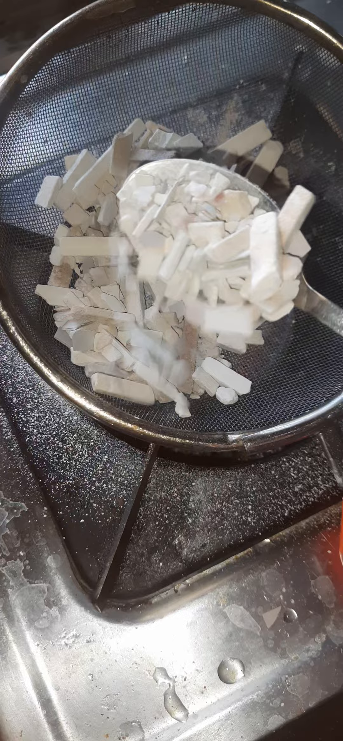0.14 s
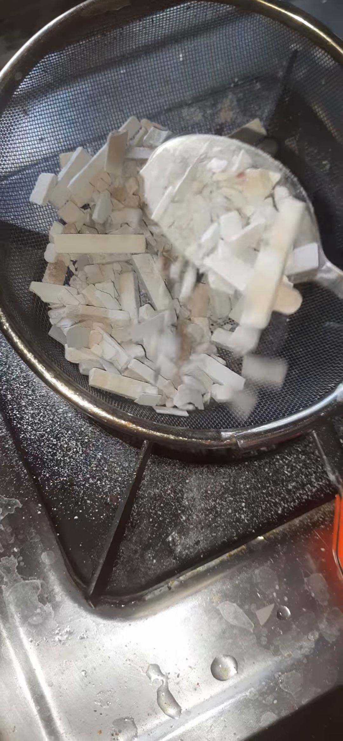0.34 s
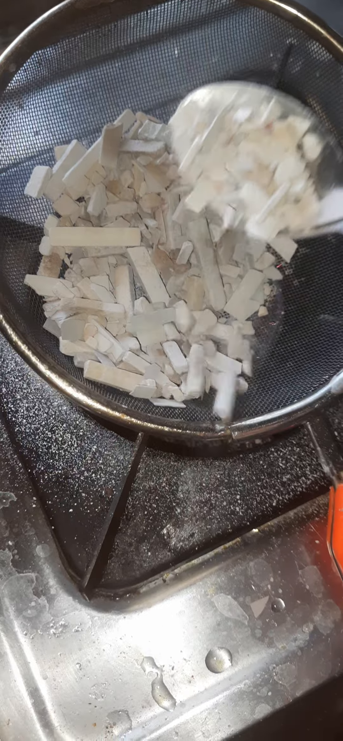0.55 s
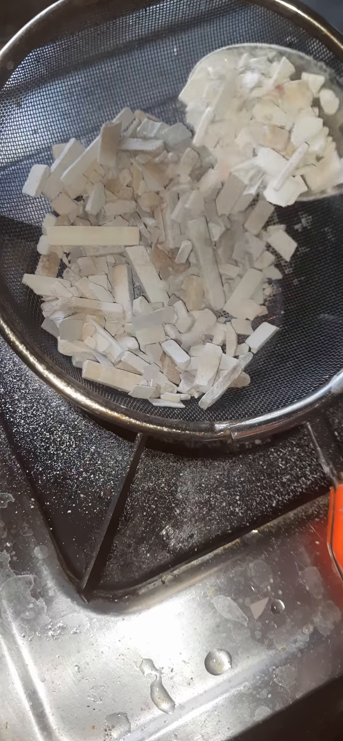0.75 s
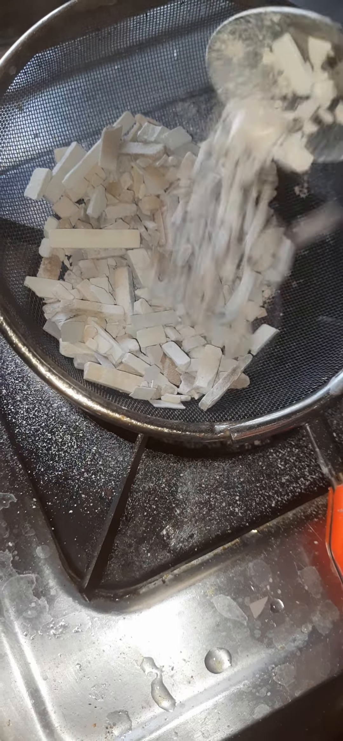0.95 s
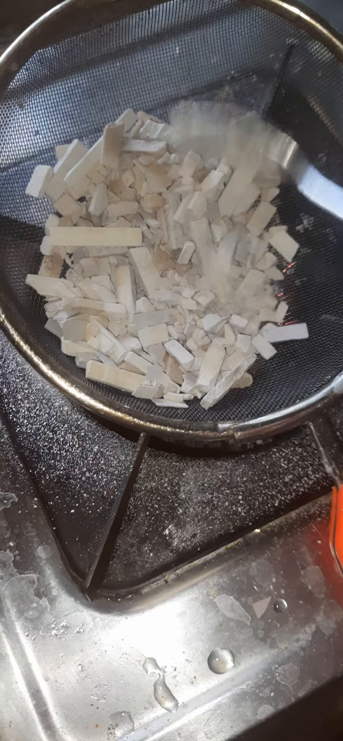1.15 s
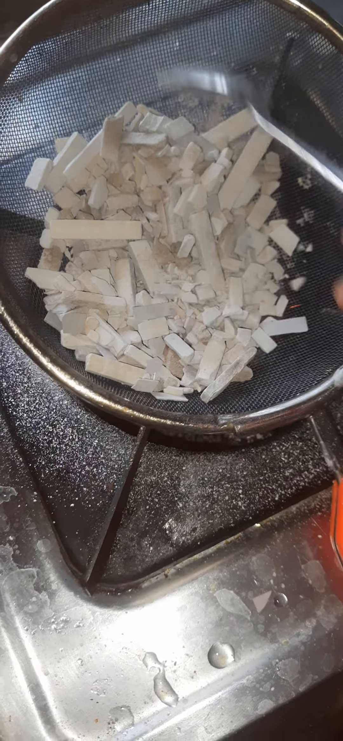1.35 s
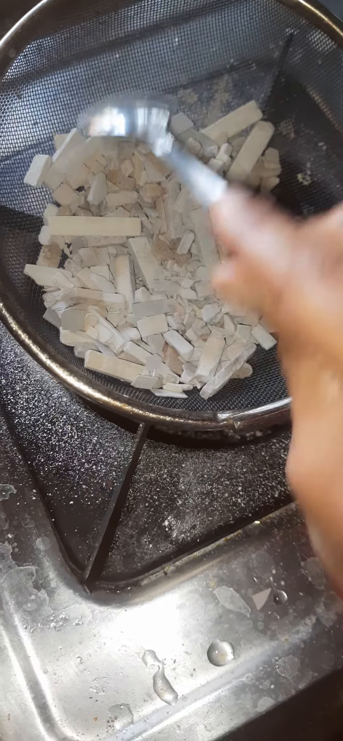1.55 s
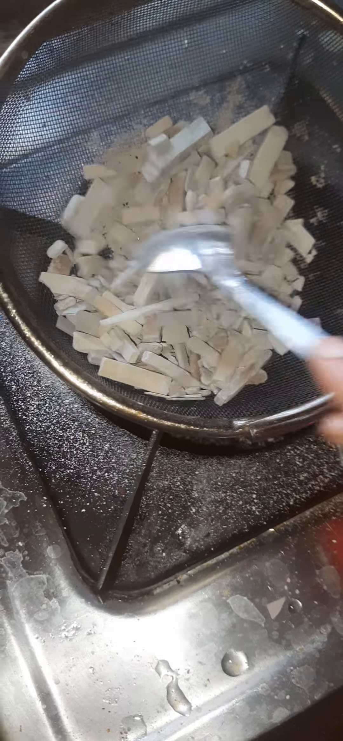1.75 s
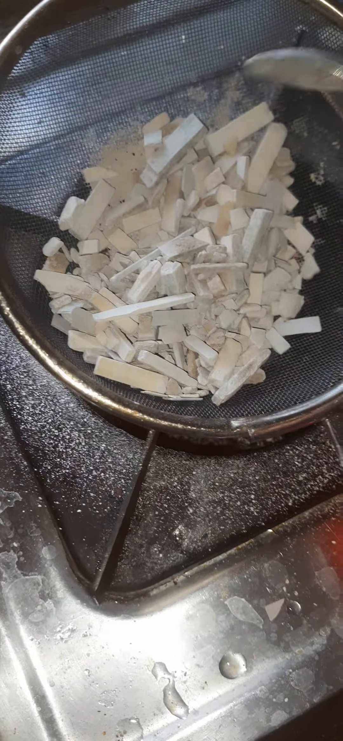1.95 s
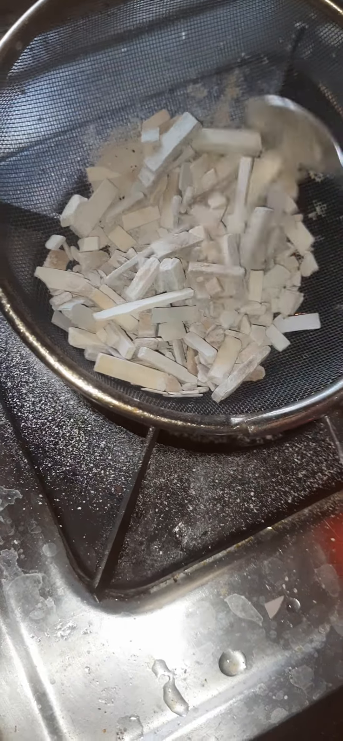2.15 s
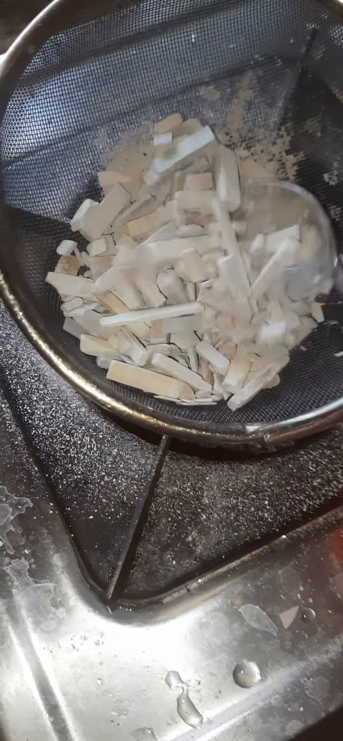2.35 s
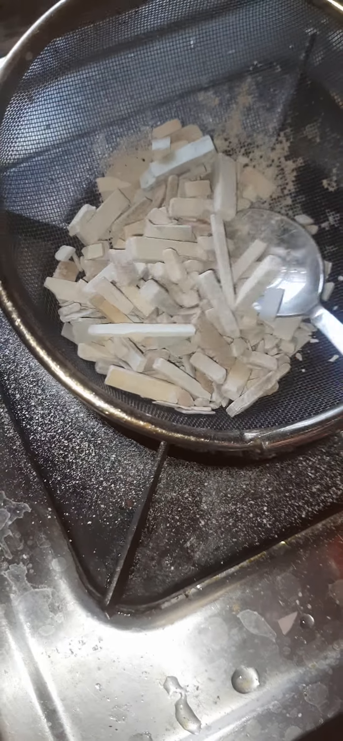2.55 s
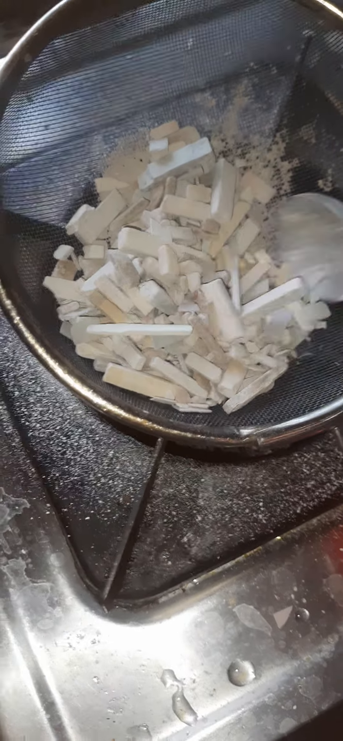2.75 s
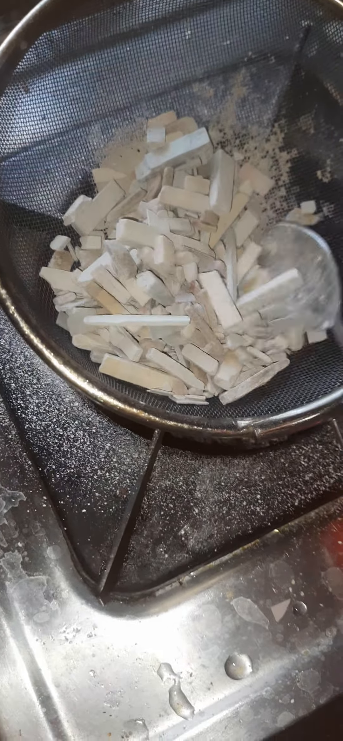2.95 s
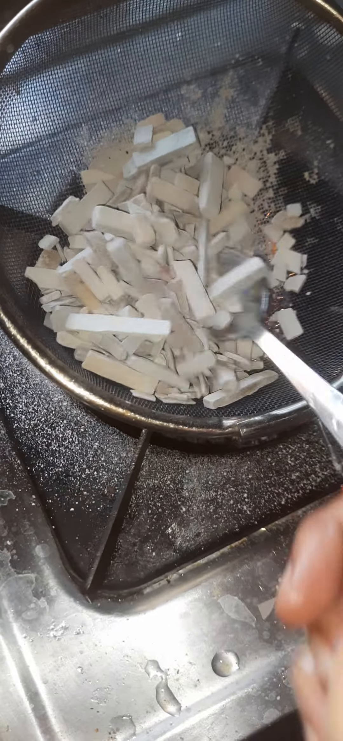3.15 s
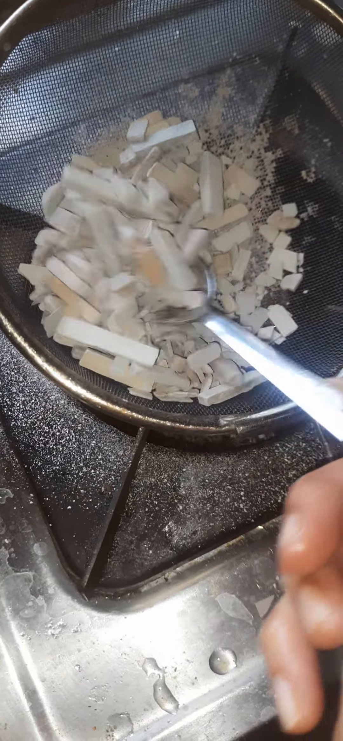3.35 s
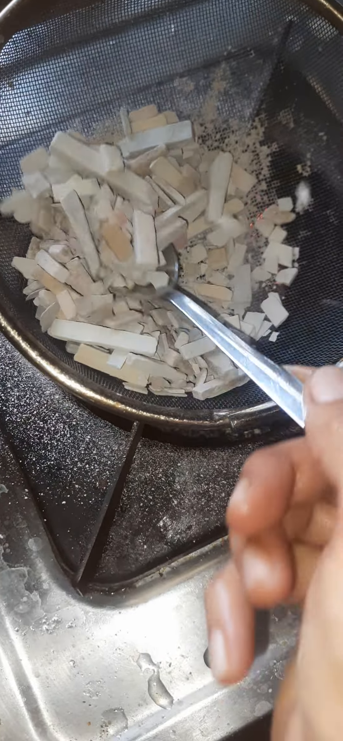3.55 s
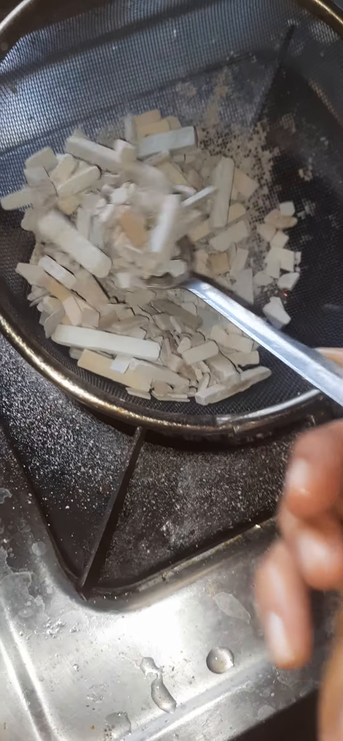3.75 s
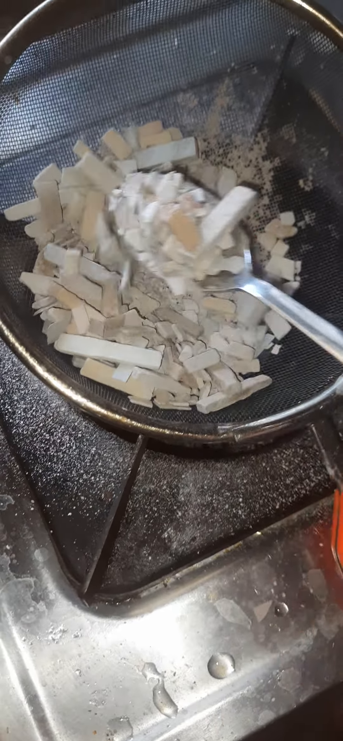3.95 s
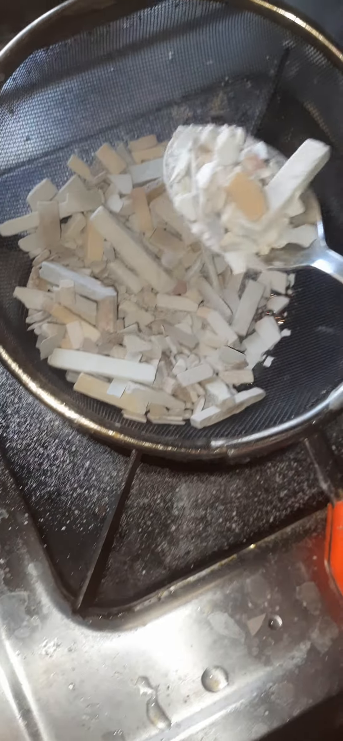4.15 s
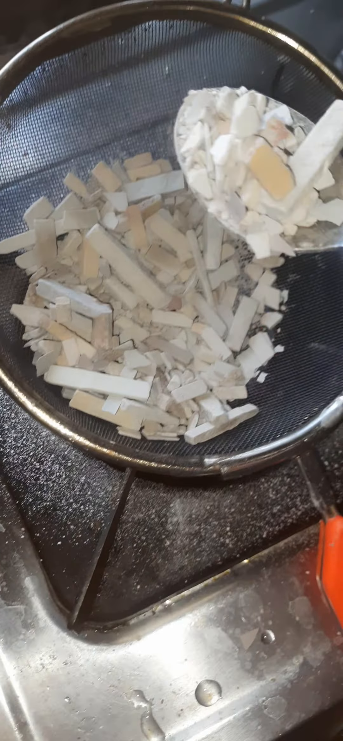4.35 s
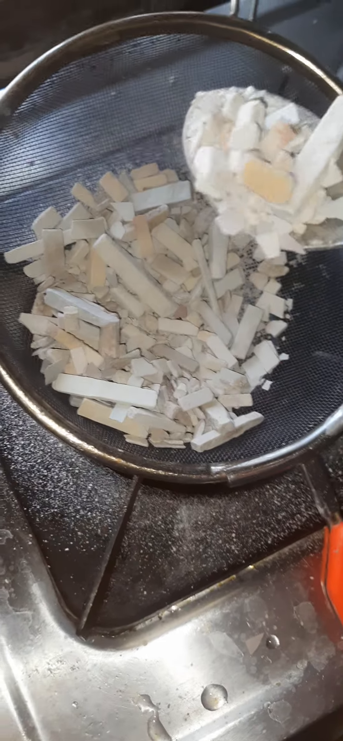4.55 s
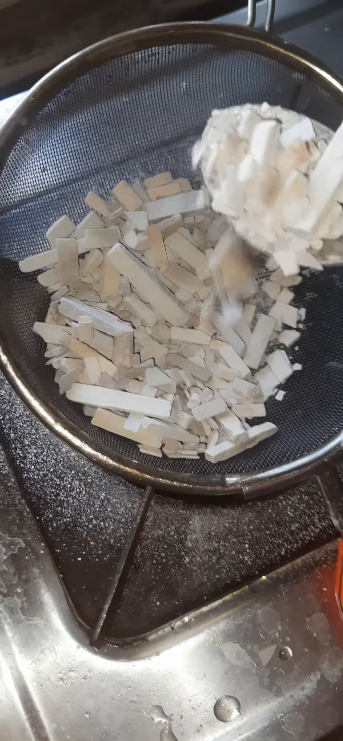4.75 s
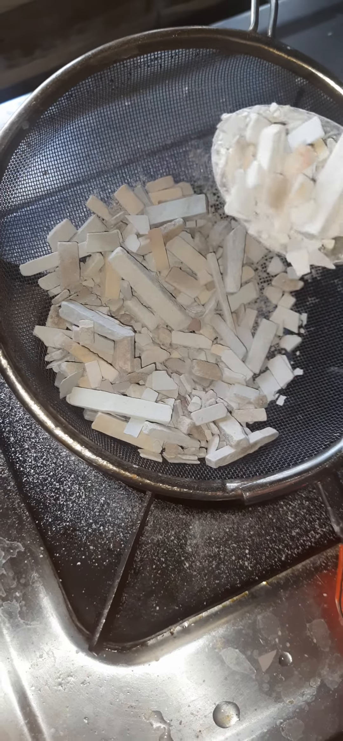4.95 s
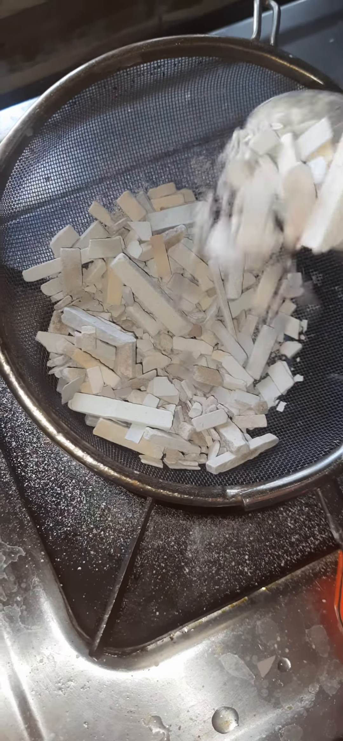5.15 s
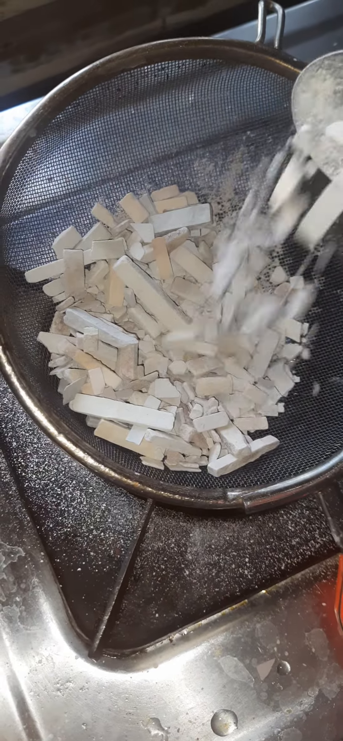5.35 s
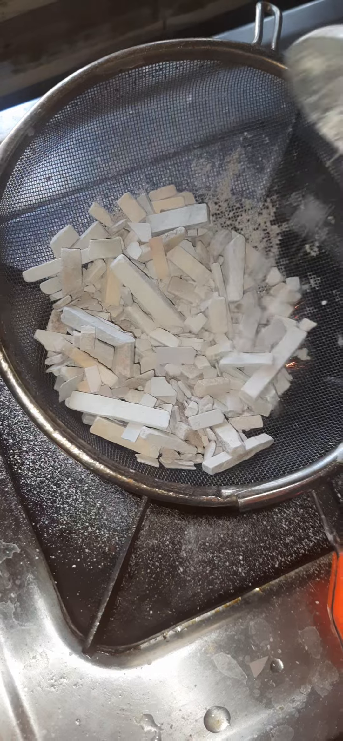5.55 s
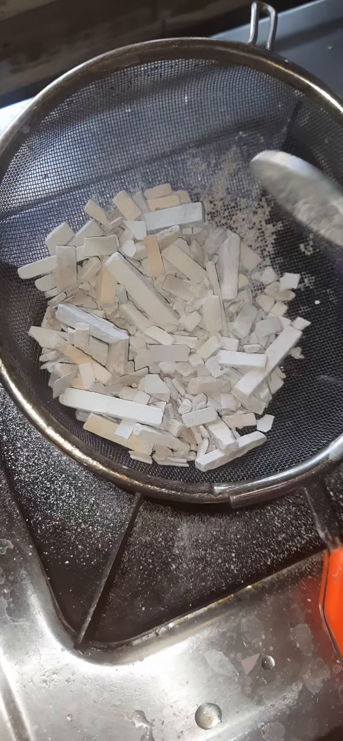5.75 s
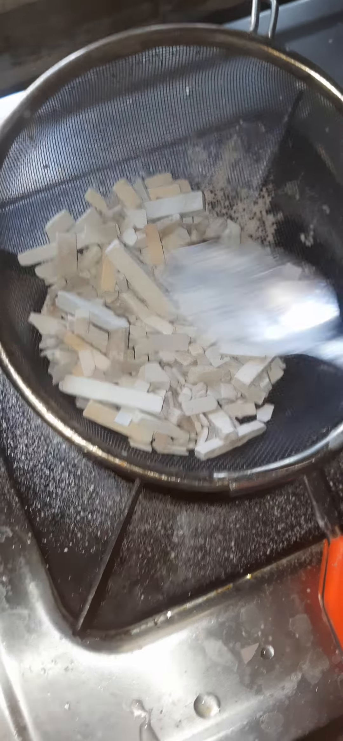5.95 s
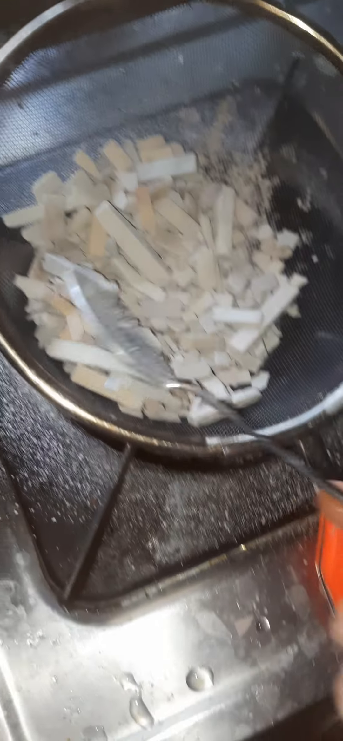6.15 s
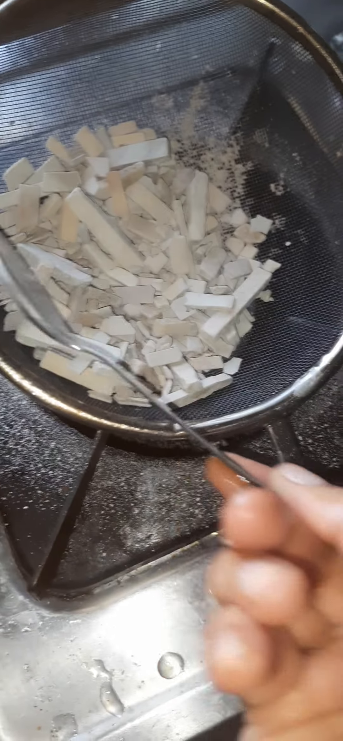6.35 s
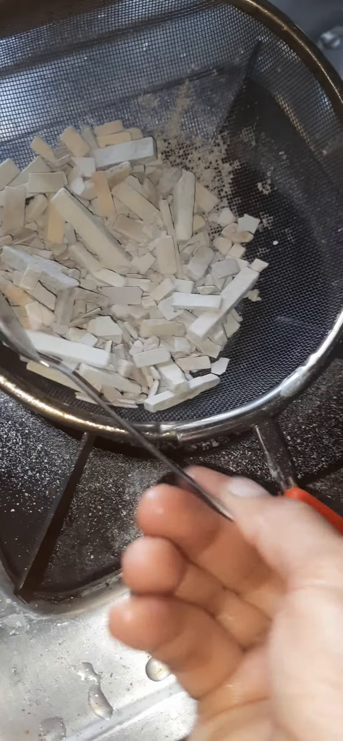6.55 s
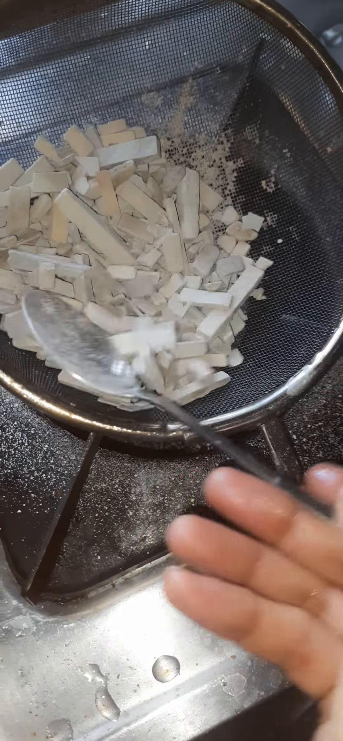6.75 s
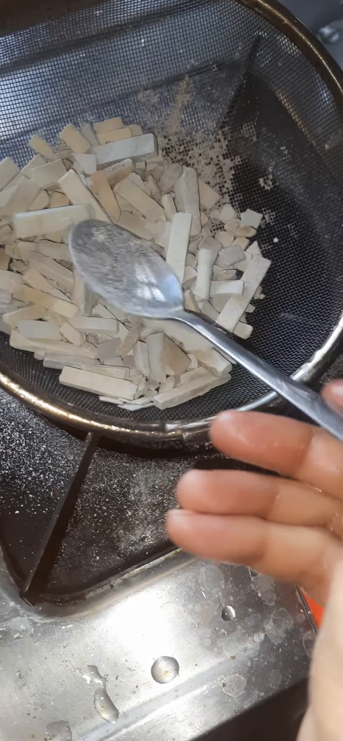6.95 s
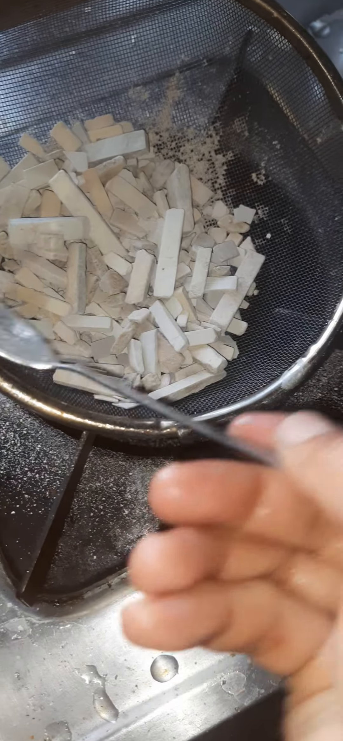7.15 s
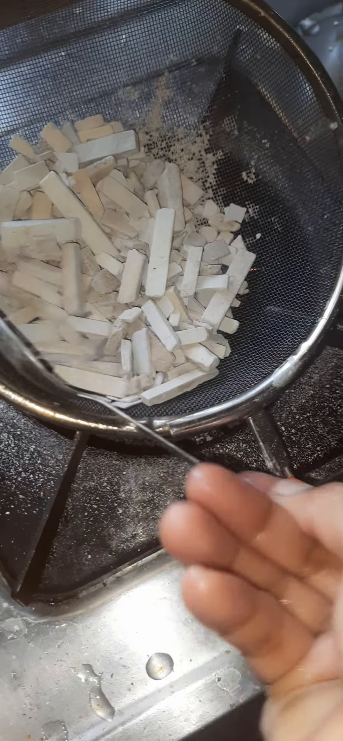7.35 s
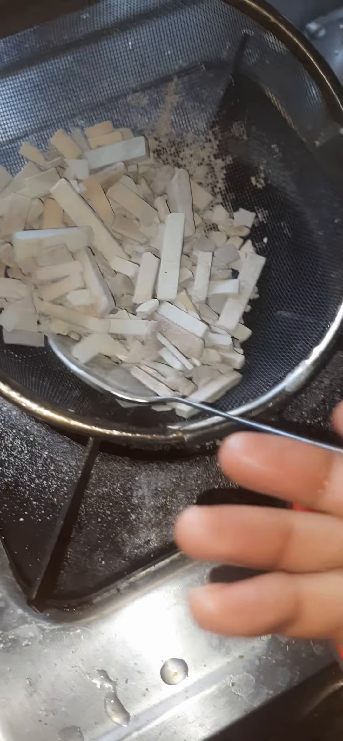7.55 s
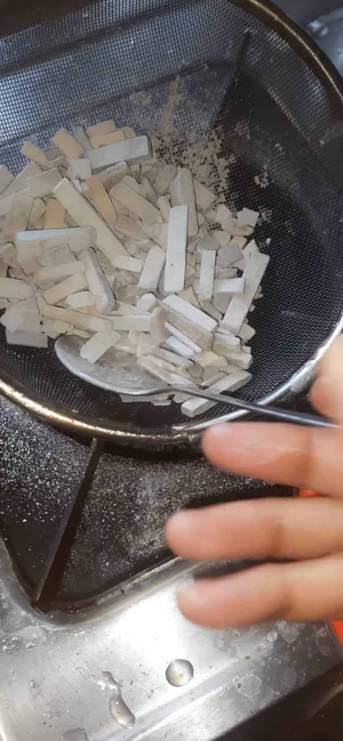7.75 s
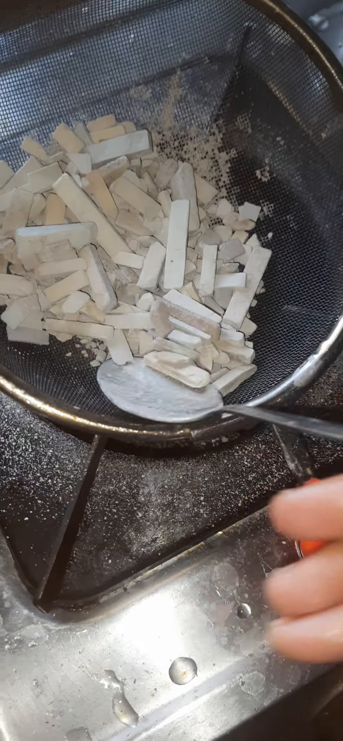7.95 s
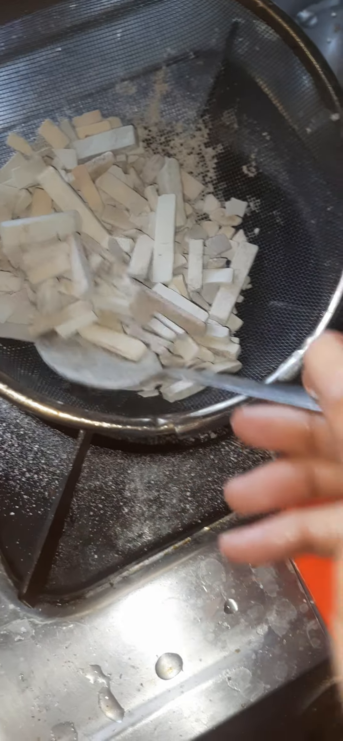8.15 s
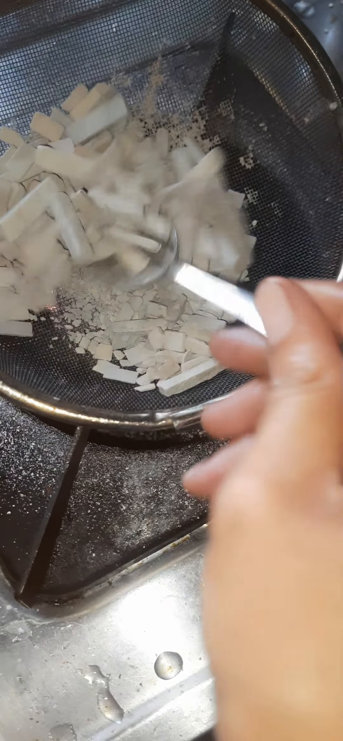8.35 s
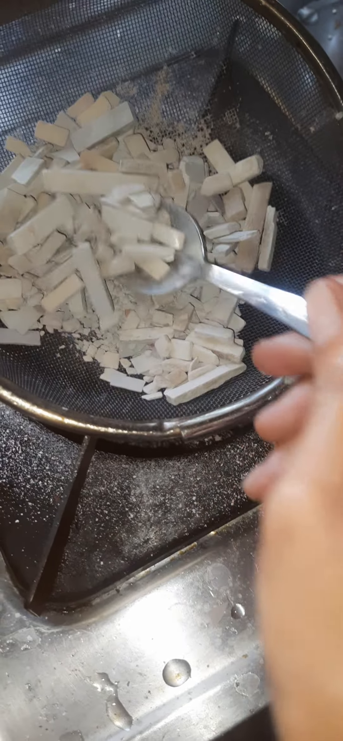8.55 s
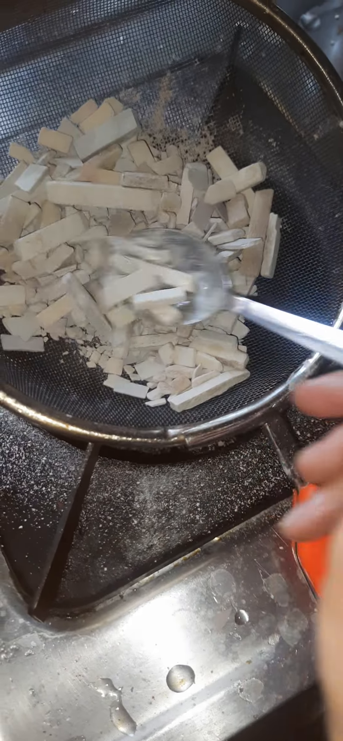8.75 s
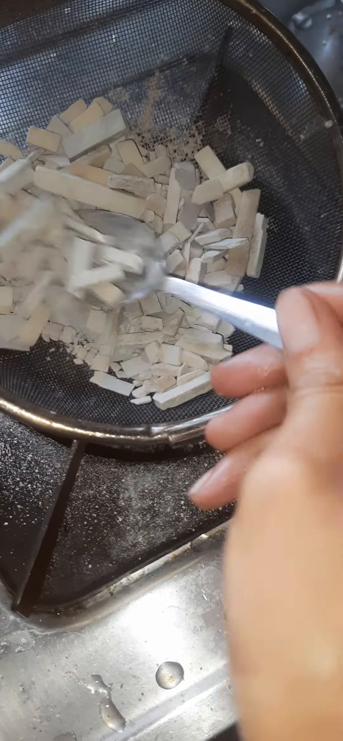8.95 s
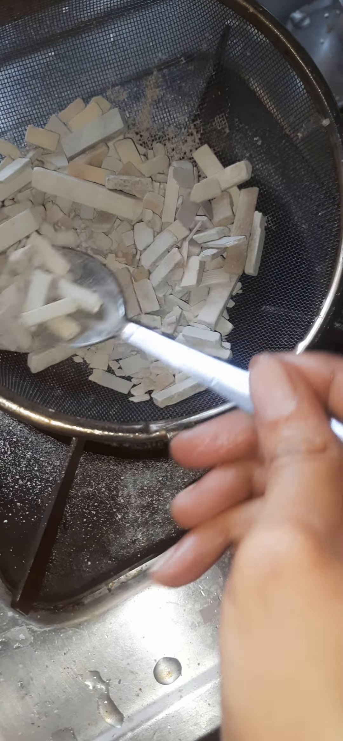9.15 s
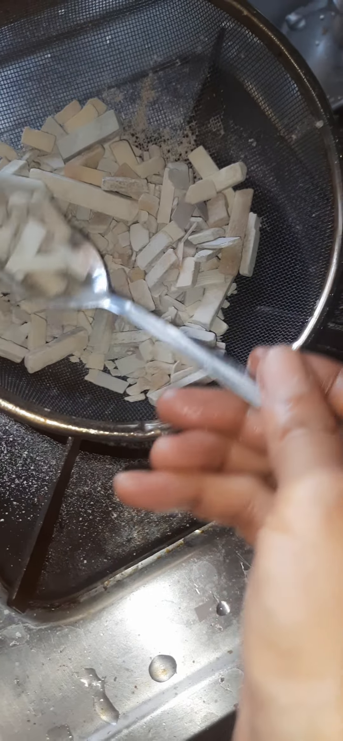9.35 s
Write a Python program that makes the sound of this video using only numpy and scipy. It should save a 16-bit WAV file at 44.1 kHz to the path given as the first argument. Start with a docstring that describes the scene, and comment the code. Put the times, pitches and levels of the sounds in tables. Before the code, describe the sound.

Close up in a hard kitchen, a gas flame rumbles softly throughout. A dense run of bright stone clacks opens as slate pieces fall from a steel spoon into a wire strainer. Stirring follows, with hard blows booming through mesh and stove around two to three and a half seconds. Sparse pours and scrapes come next, another bang near seven, then busy stirring and light tinkles. Close phone stereo, short reverberation.

```python
"""Close in a hard kitchen: slate pieces are scooped, poured and stirred with a steel spoon in a wire strainer.
A gas flame rumbles and hisses under the whole scene; a dense run of stone clacks opens it. Hard blows near
2.3, 2.8 and 3.5 s boom in strainer and stove, the first two with a jolt of air; faint swishes pass near 4 and
6 s, another hard blow falls near 7 s and tinkling strokes close it. Filtered noise makes flame and swishes,
random impulses the heap, struck resonances the blows and rings; two microphone ports of a phone pick it up."""
import sys
import numpy as np
from scipy import signal
from scipy.fft import rfft, irfft, next_fast_len
from scipy.io import wavfile
from scipy.ndimage import uniform_filter1d, map_coordinates

SR = 44100
rng = np.random.default_rng(int(sys.argv[2]) if len(sys.argv) > 2 else 0)


def master(y):
    """Save y as 16-bit WAV."""
    cut = np.clip(np.atleast_2d(y).T, -1, 1)
    pcm = np.round(cut * 32767)  # scale
    wavfile.write(sys.argv[1], SR, pcm.astype(np.int16))


N = 418509  # length in samples

# The flame's slow rise and fall. Each row: time in seconds, base rumble level in dB.
FLAME_LEVEL = [(0, -64.5), (1.2, -62), (1.9, -66), (3.4, -65.5), (4.9, -66.5), (6.5, -68), (9.49, -65)]
# Spectrum of the flame's rumble. Each row: frequency in Hz, relative density in dB per Hz.
RUMBLE_SPECTRUM = [(12, -55), (20, -35.5), (70, 8.5), (102, -5), (134, -1), (184, -12), (400, -34),
                   (520, -43.5), (880, -120)]
# Spectrum of the flame's hiss. Each row: frequency in Hz, relative density in dB per Hz.
HISS_SPECTRUM = [(180, -35.5), (300, -7), (360, -2), (391, -7.5), (676, -12.5), (812, -19.5), (2630, -32),
                 (5650, -32.5), (6780, -22.5), (9770, -32), (11000, -30.5), (15800, -31.5)]
# Decay of the room. Each row: frequency in Hz, time to fall 60 dB in seconds.
KITCHEN_DECAY = [(150, 0.38), (700, 0.62), (1840, 0.52), (4850, 0.34), (12800, 0.27)]
# Likeness of the two ports in diffuse sound. Each row: frequency in Hz, left-right correlation (0 to 1).
PORT_LIKENESS = [(60, 0.55), (130, 0.96), (290, 0.43), (640, 0.065), (1400, 0.043), (15000, 0.017)]
# Colour of the two ports. Each row: frequency in Hz, left minus right in dB.
PORT_COLOUR = [(60, -1.5), (110, 6), (200, 1.5), (380, 0), (700, -6), (1290, 2.5), (2380, 6.5), (4400, 3.5),
               (8120, 4), (15000, 2.5)]
# Faint whistling swishes. Each row: start in seconds, end in seconds, level in dB.
SWISH_TIMES = [(4.153, 4.363, -90), (5.778, 5.943, -81), (5.935, 6.13, -82.5)]
# The stove jolts under the hardest blows. Each row: start in seconds, level in dB before the port gains.
JOLT_PUSHES = [(2.307, -14.5), (2.751, -36.5)]
# Ringing modes of spoon and stone. Each row: frequency in Hz, time to fall 60 dB in seconds.
RINGING_MODES = [(4250, 0.029), (5060, 0.056), (8060, 0.081), (14200, 0.07)]
# Short rings of the steel spoon or, near 4250 Hz, of a stone; the spot favours modes near one pitch.
# Each row: start in seconds, level at the favoured pitch in dB, favoured pitch in Hz.
RINGING_TAPS = [(.44, -37, 4250), (.72, -44, 4250), (.84, -65, 14200), (1.57, -45.5, 14200),
                (6.24, -50.5, 5400), (6.94, -30.5, 6400), (8.41, -50, 14200), (8.55, -55, 5060),
                (8.763, -52, 5060), (8.823, -49, 5060), (9.008, -41, 5060)]
# Modes of strainer and stove. Each row: frequency in Hz, width in Hz, level in dB re the direct blow.
STRAINER_MODES = [(148.5, 5.6, 2.5), (253.4, 14, 5.5), (302.4, 18, -1.5), (355.7, 11, -1), (459.5, 22, 9),
                  (557.3, 8.3, 9), (607, 55, -4), (820, 42, -0.5), (1028, 20, -5), (1190, 9.3, -6.5),
                  (1462, 29, 1), (1727, 30, 3.5), (2210, 62, 9), (2585, 18, 10)]
# Broad thud of soft blows. Each row: frequency in Hz, relative density in dB per Hz.
THUD_SPECTRUM = [(53, -45), (90, -12), (146, -8.5), (185, -10.5), (408, 1.5), (445, -2.5), (494, -8.5),
                 (825, -9.5), (1620, -26.5), (3000, -43), (3900, -58.5), (6600, -120)]
# Hard blows on the frame. Each row: frequency in Hz, relative density in dB per Hz.
KNOCK_SPECTRUM = [(350, -37), (650, -9.5), (1100, 10), (1500, 0), (2400, -5), (3500, -13), (5000, -46)]
# Stone on stone. Each row: frequency in Hz, relative density in dB per Hz.
STONE_SPECTRUM = [(900, -18), (1800, -9), (3000, -5), (5000, -4), (6500, -3), (8000, -1), (8700, -5.5),
                  (9300, -13), (11500, -12), (14000, -11), (15700, -13.5), (16100, -36.5), (17000, -38)]
# Each pour, blow or spoon stroke that sets the heap moving.
# Each row: start in seconds, swell in seconds, hold in seconds, rattle level in dB, boom level in dB.
HEAP_STROKES = [(0.003, .006, 0.02, -57.5, -60), (.1256, 0.015, 0.096, -55, -47.5),
                (.31, 0.016, 0.0063, -43, -50.5), (0.431, 0.012, 0.0047, -55, -45),
                (0.516, 0.0056, 0.027, -48, -41), (1.0014, 0.011, 0.089, -54.5, -51.5),
                (1.205, 0.0074, 0.019, -67, -59.5), (1.35, .01, .02, -71, -66.5),
                (1.571, 0.0096, 0.16, -56, -59.5), (1.584, 0.14, 0.082, -53, -43.5),
                (2.036, .04, 0.18, -53, -43), (2.308, 0.0095, 0.046, -37, -39.5),
                (2.48, 0.017, 0.018, -68, -52), (2.748, 0.0077, 0.026, -38, -39),
                (2.842, .05, .19, -51, -42), (3.158, 0.022, 0.018, -51, -39.5),
                (3.305, 0.029, 0.062, -59, -47), (3.499, 0.012, 0.064, -49, -48.5),
                (3.76, 0.11, 0.01, -62, -57.5), (3.93, 0.017, 0.043, -66.5, -57),
                (4, 0.00714, 0.0083, -52, -40.5), (4.427, 0.017, 0.027, -96.5, -68.5),
                (4.858, 0.024, 0.027, -74, -64.5), (5.273, 0.0097, 0.026, -53.5, -45),
                (5.367, 0.045, 0.095, -51.5, -44.5), (5.604, 0.019, 0.012, -62, -54.5),
                (5.781, 0.0079, 0.0099, -70.5, -70), (6.232, 0.011, 0.027, -76, -61.5),
                (6.473, 0.0057, 0.078, -71, -53), (6.586, 0.099, 0.23, -58, -48.5),
                (7.182, 0.0089, 0.023, -47, -44.5), (7.31, 0.21, 0.017, -52.5, -44.5),
                (7.704, 0.024, 0.012, -68, -58), (7.858, 0.043, 0.021, -60.5, -50.5),
                (8.1, .07, 0.046, -54.5, -41.5), (8.235, .018, 0.0073, -51.5, -39),
                (8.31, .02, 0.047, -51, -43.5), (8.38, 0.034, 0.029, -50, -39),
                (8.54, 0.016, 0.024, -76, -69), (8.716, 0.028, .015, -72, -60.5),
                (8.82, 0.047, .02, -59.5, -52.5), (8.887, 0.0069, 0.011, -68, -41.5),
                (8.992, .015, 0.022, -60.5, -52.5), (9.07, 0.0082, .015, -65, -46),
                (9.12, 0.044, 0.09, -62.5, -52.5), (9.33, 0.027, 0.1, -72, -64.5)]
# Changing colour of the stones. Each row: time in seconds, drive of the upper boom in dB re the soft drive,
# gain of the top treble in dB, level of the hollow ring in dB re the boom.
STONE_TONE = [(0, -10.5, -0.7, -2), (1.3, -8.5, 2.6, -2.5), (1.7, -10.5, 2.5, -14), (2.6, -15, -4.5, -15.5),
              (3.2, -14.5, 2.5, -9.5), (4.2, -13.5, 2.5, -11.5), (5.2, -13, 5.5, -12.5),
              (5.9, -13, 0.5, -8.5), (6.5, -16.5, 0.5, -16.5), (7.6, -9, 0, -12.5),
              (8.2, -17.5, 1.5, -20.5), (8.9, -16.5, 0.5, -26), (9.49, -15.5, 1.5, -7)]
# Single contacts, loud and faint. Each row: start in seconds, crack peak in dB before the snap and treble
# gain, knock drive in dB re that peak (before the boom gain), brightness in dB per octave (held within 9
# either way).
CLACK_BLOWS = [(0.0183, -37.5, -33, 6.5), (0.0619, -33.5, -13, 6), (0.125, -31.5, -32, 1),
               (0.15, -22.5, -11.5, 0.5), (.173, -22.5, -14, -1), (0.2368, -24, -29, 3),
               (0.3099, -27, -23, 6), (0.3177, -28, -7.5, 1), (0.4215, -28, -10.5, -0.5),
               (0.4401, -21.5, -17, -0.5), (0.5206, -18, -16, 3.5), (.55, -24, -15, -2),
               (0.5955, -20.5, -21, 2.5), (0.6265, -30, -14, -1.5), (0.6412, -27.5, -6.5, -2.5),
               (0.7223, -35, -12, 16), (.7412, -39, -31, 15), (.801, -48.5, -34, 9), (0.963, -45.5, -40, 9),
               (.9852, -39, -29, 9), (1.0022, -30.5, -13, 4), (1.076, -28.5, -38, -1),
               (1.2133, -36.5, -7, -.6), (1.292, -47, -24, 9), (1.3578, -35.5, -43, 7),
               (1.5679, -49, -26.5, 5), (2.0486, -36.5, -9, -3.5), (2.3027, -14.5, -20, -6.5),
               (2.304, -5, -8.5, -2.5), (2.7548, -8.5, -8.5, -6), (3.0444, -33.5, -1, 5),
               (3.1864, -26, -8.5, 5.5), (3.227, -37, -21, -6), (3.498, -9.5, -12.5, -0.3),
               (3.8852, -37, -8, -1.5), (4.0084, -25.5, -21, 1), (4.1269, -37, -7.5, -2.5),
               (4.4394, -61.5, 7.5, -3), (4.7677, -56, -25, 4), (4.8698, -47, -31.5, 9),
               (5.204, -47.5, -27, 7.5), (5.2774, -35, -14, 8), (5.307, -35, -26, 2.5),
               (5.3695, -32.5, -22, .6), (5.444, -30, -24, 6), (5.625, -40, -32.5, 6),
               (5.7204, -46, -24.5, 7), (5.7877, -42, -32.5, 6.5), (6.4778, -40, -16, 3.5),
               (6.9403, -37.5, -17, 8), (7.1853, -14.5, -11.5, -3), (7.4738, -37.5, 2, -1),
               (7.9246, -34.5, -18, 3), (8.1, -41.5, -12, 1), (8.4221, -27.5, -25, -1.9),
               (8.4532, -24, -5.5, 1), (8.728, -61, 6, 3), (8.762, -46.5, -26, 6.5), (8.887, -39, -1.5, 6),
               (8.9, -30.5, -4, -13), (8.912, -34, -3, -13), (8.93, -36.5, -4, -11),
               (9.0092, -42, -24, 2.5), (9.1008, -34, -23, -1.5), (9.181, -36.5, -9, 0),
               (9.2437, -29.5, -8.5, .6)]


def amp(db):
    """Amplitude ratio of a level in dB."""
    return 10 ** (np.asarray(db) / 20)


def unit(x):
    """Scale to an RMS of 1."""
    return x / np.sqrt(np.mean(x ** 2) + 1e-20)


def along(points, hz):
    """Interpolate (Hz, value) points on a log axis."""
    f, v = np.transpose(points)
    return np.interp(np.log(hz + 1), np.log(f + 1), v)


def curves(rows):
    """One value per sample for each column after the time."""
    s, *cols = np.transpose(rows)
    return [np.interp(np.arange(N) / SR, s, c) for c in cols]


def wobble(rate):
    """A smooth random curve, rate knots a second."""
    knots = rng.standard_normal(int(N * rate / SR) + 4)
    return map_coordinates(knots, [np.arange(N) * rate / SR])


def filtered(x, response):
    """Multiply the spectrum of x by a complex response of frequency."""
    m = next_fast_len(x.shape[-1] + 8192)
    spectrum = rfft(x, m) * response(np.fft.rfftfreq(m, 1 / SR))
    return irfft(spectrum, m)[..., :x.shape[-1]]


def resonance(f, centre, width):
    """Response of one damped mode, 1 at its centre; all in Hz."""
    return 1j * f * width / (centre ** 2 - f * f + 1j * f * width)


def causal(points, tilt_db=0):
    """Minimum-phase impulse response of a spectrum tilted in dB per octave about 6 kHz, energy 1."""
    hz = np.fft.rfftfreq(4096, 1 / SR)
    slope = tilt_db * np.log2(np.maximum(hz, 2000) / 6000)  # level below 2 kHz
    cepstrum = irfft(np.log(amp(np.maximum(along(points, hz), -70) + slope)))
    # folding the cepstrum forward puts the energy as early as possible
    cepstrum[1:2048] *= 2
    cepstrum[2049:] = 0
    h = irfft(np.exp(rfft(cepstrum)))[:2048]
    return h / np.linalg.norm(h)


def paired(noise):
    """Two unrelated signals become left and right, alike in the bass."""
    def shares(hz):
        turn = np.arccos(np.clip(along(PORT_LIKENESS, hz), -1, 1)) / 2
        return np.array([np.cos(turn), np.sin(turn)])
    both = filtered(noise, shares)
    middle, side = both[..., 0, :], both[..., 1, :]
    return np.stack([middle + side, middle - side], axis=-2)


def motion():
    """Levels in dB of rattle and boom: each stroke swells, holds and settles; overlapping ones add."""
    settle_db_per_s = np.array([[166.5], [138]])  # rattle, boom
    trickle_db, trickle_db_per_s = -22, 56  # stragglers roll on more slowly after each stroke
    with_clack_s = 0.012  # a stroke this close to a clack is set off by it
    swell_power = 1.02  # a stroke grows from silence as this power of the time
    t = np.arange(N) / SR
    power = np.full((2, N), 1e-12)
    for s, swell, hold, *db in HEAP_STROKES:
        clack = min((row[0] for row in CLACK_BLOWS), key=lambda c: abs(c - s))
        s = clack if abs(clack - s) < with_clack_s else s
        a = round(s * SR)
        u = t[a:a + SR] - s
        rise = np.clip(u / swell, 0, 1) ** swell_power
        after = np.maximum(u - swell - hold, 0)
        left = amp(-2 * settle_db_per_s * after) + amp(2 * (trickle_db - trickle_db_per_s * after))
        power[:, a:a + SR] += (amp(np.c_[db]) * rise) ** 2 * left
    return 10 * np.log10(power)


def burner():
    """The flame rumbles unsteadily over a faint hiss, the rumble louder while the heap moves."""
    hiss_db = -75.5  # base level, before its wobble
    # rumble dB per dB of boom, its sluggishness, the boom that leaves the rumble unchanged
    fanned, fan_s, fan_db = 0.18, 0.25, -55

    def noise(points):
        return unit(filtered(paired(rng.standard_normal((2, N))), lambda hz: amp(along(points, hz))))
    stir = uniform_filter1d(amp(motion()[1]), round(fan_s * SR))
    stir_db = 20 * np.log10(stir + 1e-5)
    rumble_db = curves(FLAME_LEVEL)[0] + fanned * (stir_db - fan_db) + 3.1 * wobble(12)
    rumble = amp(rumble_db) * noise(RUMBLE_SPECTRUM)
    return rumble + amp(hiss_db + 0.9 * wobble(6.8)) * noise(HISS_SPECTRUM)


def kitchen(x):
    """Hard walls answer; every stretch of sound finds a new path, each frequency dying at its own speed."""
    step = SR // 5
    parts = np.pad(x, (0, -N % step)).reshape(-1, 1, step)
    hz, t, z = signal.stft(rng.standard_normal((len(parts), 2, 3 * step)), SR, nperseg=256)
    fading = amp(-60 * t / along(KITCHEN_DECAY, hz)[:, None])
    fading = fading + amp(6.0 - 60 * t / 0.057)  # a fast early decay comes before the slower tail
    tails = paired(signal.istft(z * fading, SR, nperseg=256)[1][..., :3 * step])
    tails *= np.clip(np.arange(3 * step) / SR / 0.00073, 0, 1)  # soft onset
    wet = signal.fftconvolve(parts, tails / np.sqrt(np.mean(tails ** 2) * 3 * step), axes=2)
    out = np.zeros((2, N + 5 * step))
    for k, w in enumerate(wet):
        out[:, k * step:][:, :w.shape[1]] += w
    return out[:, :N]


def swishes():
    """Narrow noise near 2 kHz that starts softly and fades."""
    t = np.arange(N) / SR
    level = np.zeros(N)
    for a, b, db in SWISH_TIMES:
        level += amp(db) * np.interp(t, [a, a + 0.015, b - 0.05, b], [0.042, 0.93, 0.8, 0.031])
    band = lambda hz: np.exp(-((hz - 2120) / 260) ** 2)
    return level * unit(filtered(rng.standard_normal((2, N)), band))


def jolts():
    """One slow push of air per jolt, strongest at the left port; the deepest bass is not passed."""
    out = np.zeros(N + SR)
    u = np.arange(SR // 8) / SR / 0.004
    for s, db in JOLT_PUSHES:
        out[round(s * SR):][:len(u)] += amp(db) * u * (2 - u) * np.exp(-u)
    no_deep_bass = lambda hz: (1j * hz / (36 + 1j * hz)) ** 4
    return filtered(out[:N], no_deep_bass) * amp([[3], [-9]])  # left, right


def short_rings():
    """The steel spoon or, near 4250 Hz, a stone rings briefly in decaying modes."""
    off_db_per_oct, off_most_db = 50, 18  # modes fall away from the favoured pitch, this far at most
    rough_rad = 0.046  # random phase step per sample that roughens the ring
    out = np.zeros(N + SR)
    t = np.arange(SR // 6) / SR
    for s, db, near_hz in RINGING_TAPS:
        for hz, t60 in RINGING_MODES:
            off_db = min(off_db_per_oct * abs(np.log2(hz / near_hz)), off_most_db)
            phase = 2 * np.pi * hz * t + rough_rad * np.cumsum(rng.standard_normal(len(t)))
            out[round(s * SR):][:len(t)] += amp(db - off_db - 60 * t / t60) * np.sin(phase)
    return out[:N]


def treble(x):
    """Give the top treble, above about 9.5 kHz, its own moving level."""
    top = filtered(x, lambda hz: 1 / (1 + (9500 / (hz + 1)) ** 12))
    return x + (amp(curves(STONE_TONE)[1]) - 1) * top


def boom(soft, hard):
    """Blows ring the modes of strainer and stove, soft ones over a broad thud, hard ones higher up."""
    modes = lambda f: 1 + sum(amp(db) * resonance(f, c, w) for c, w, db in STRAINER_MODES)
    thud = signal.fftconvolve(soft, causal(THUD_SPECTRUM))[:N]
    knock = signal.fftconvolve(hard, causal(KNOCK_SPECTRUM))[:N]
    return filtered(thud + knock, modes)


def contacts(per_second, spread_db):
    """Tiny stone contacts at random moments, few large and many small, coming in clumps."""
    chance = per_second / SR * amp(3 * wobble(40))
    size = amp(spread_db * np.minimum(rng.exponential(size=N), 4)) * rng.choice([-1, 1], size=N)
    return unit(size * (rng.random(N) < chance))


def spread_out(train):
    """Pieces lie all over the strainer: each contact reaches the far right port after its own delay."""
    at = np.flatnonzero(train)
    late = at + rng.integers(2, 11, size=len(at))
    return np.array([train, np.bincount(late, train[at], minlength=N + 16)[:N]])


def heap():
    """The stirred and poured pieces rattle together and drum on the mesh."""
    rattle_db, boom_db = motion()
    upper_db, _, hollow_db = curves(STONE_TONE)
    taps = spread_out(contacts(1500, spread_db=2.8))
    chips = spread_out(contacts(140, spread_db=3.0))  # sparser ticks of larger chips
    taps = taps + amp(-8.5) * chips
    # the modes of spoon and stone ring along
    ring_along = lambda f: 1 + amp(-7.0) * sum(resonance(f, c, 90) for c, _ in RINGING_MODES)
    stones = signal.fftconvolve(taps, causal(STONE_SPECTRUM)[None], axes=1)[:, :N]
    rattle = unit(filtered(stones, ring_along))
    drum = unit(boom(contacts(1500, spread_db=2), amp(upper_db) * contacts(600, spread_db=2.0)))
    # pieces landing on the heap ring hollow
    hollow = filtered(contacts(300, spread_db=2.5), lambda f: resonance(f, 828.6, 170) ** 2)
    drum = drum + amp(hollow_db) * unit(hollow)
    return amp(rattle_db) * treble(rattle), amp(boom_db) * drum


def clacks():
    """Each contact is a sharp crack with a little crumbling, a thud on the mesh and a knock on the frame."""
    snap_db = -17.5  # bare edge re the crack, all pitches alike
    thud_db = -18  # drive of the thud re the crack, before the boom gain
    out, soft, hard = np.zeros(N + SR), np.zeros(N), np.zeros(N)
    t = np.arange(SR // 16) / SR
    for s, db, knock_db, tilt_db in CLACK_BLOWS:
        at = round(s * SR)
        crumbling = 0.17 * rng.standard_normal(len(t)) * amp(-60 * t / 0.0028)
        stone = causal(STONE_SPECTRUM, np.clip(tilt_db, -9, 9))
        crack = signal.fftconvolve((t == 0) + crumbling, stone)[:len(t)]
        out[at:][:len(t)] += amp(db) * crack / np.abs(crack).max()
        out[at] += amp(db + snap_db)
        soft[at] = amp(db + thud_db)
        hard[at] = amp(db + knock_db)
    return out[:N] + amp(7.5) * boom(soft, hard)  # a blow's energy spreads over many slow cycles


def scene():
    """Stones, short rings and their echoes over jolts, flame and swishes."""
    rattle, drum = heap()
    struck, rings = treble(clacks()), short_rings()
    near = drum + struck + rings
    direct = rattle + np.array([near, np.pad(near, (5, 0))[:N]])  # the left port is nearer, by 5 samples
    echoes = kitchen(amp(-5.0) * (rattle[0] + drum) + amp(3.5) * struck + amp(-4.5) * rings)
    return direct + echoes + jolts() + burner() + swishes()


def record(dry):
    """The two ports differ in colour; nothing passes above the band limit."""
    top_hz = 16900
    ports = lambda hz: amp(along(PORT_COLOUR, hz) * np.array([[0.5], [-0.5]]))
    return filtered(dry, lambda hz: ports(hz) * (hz < top_hz))


dry = scene()
out = record(dry)
master(out)
```